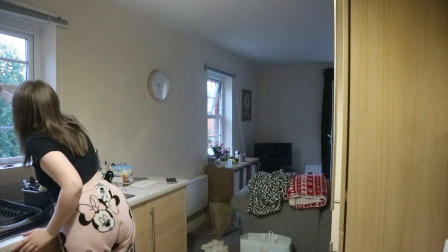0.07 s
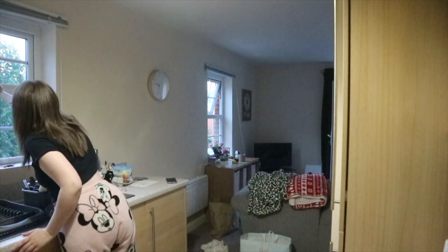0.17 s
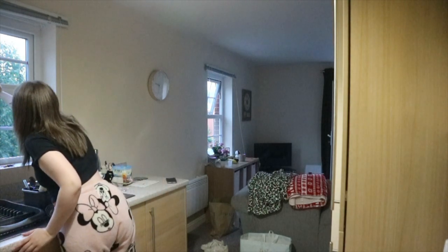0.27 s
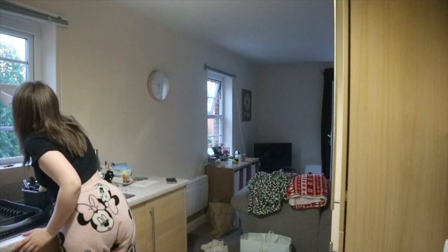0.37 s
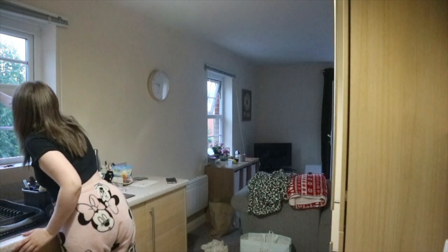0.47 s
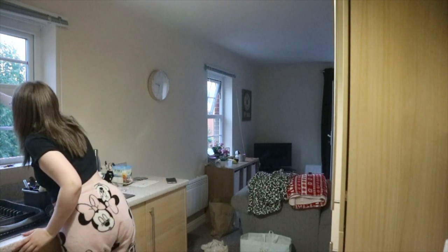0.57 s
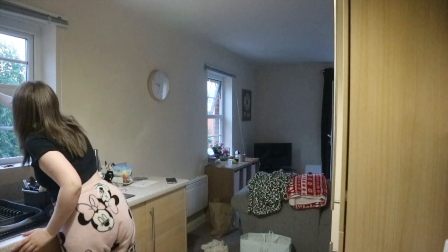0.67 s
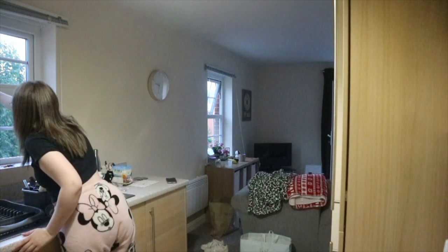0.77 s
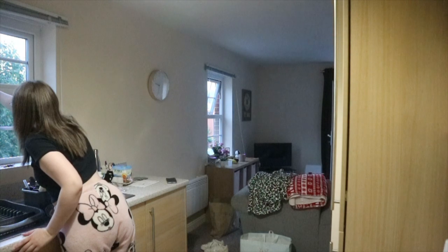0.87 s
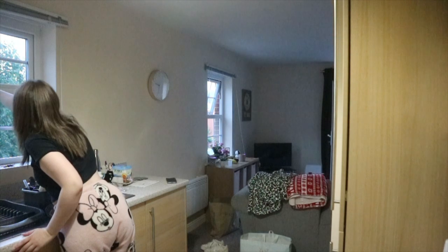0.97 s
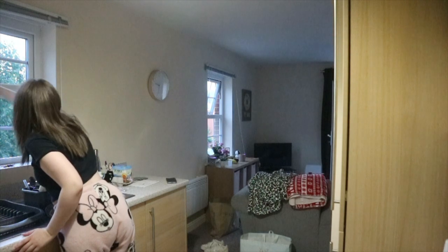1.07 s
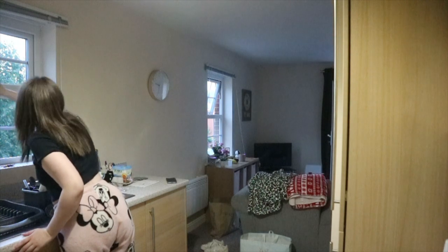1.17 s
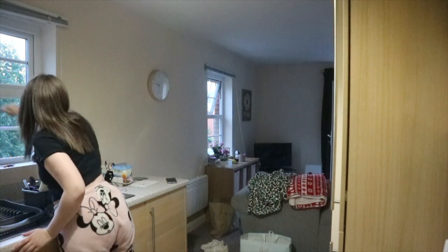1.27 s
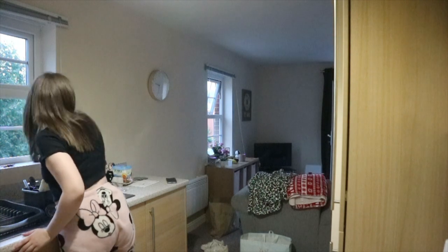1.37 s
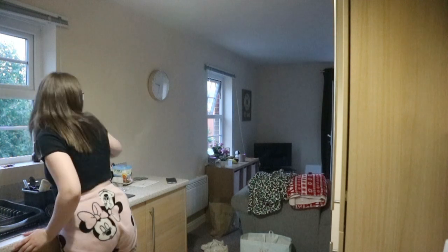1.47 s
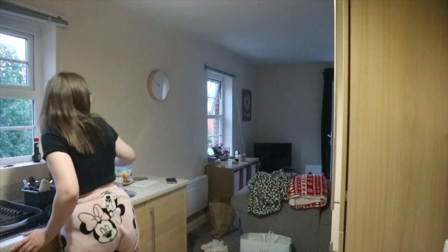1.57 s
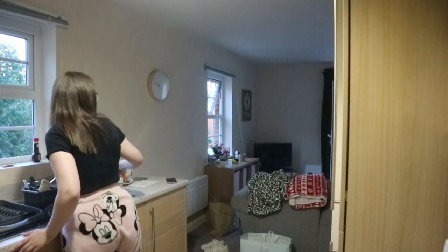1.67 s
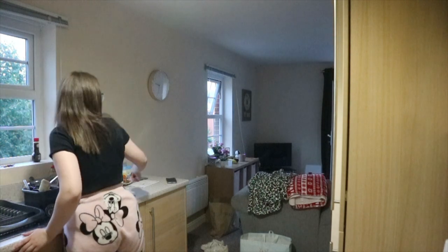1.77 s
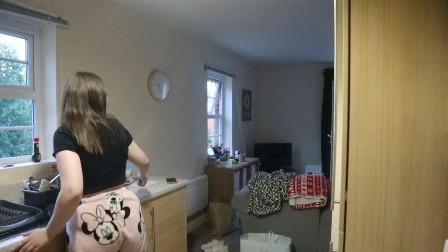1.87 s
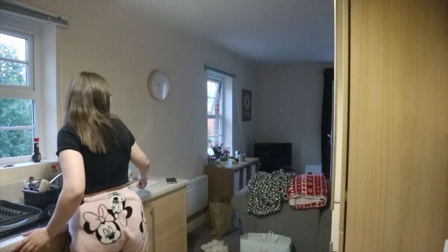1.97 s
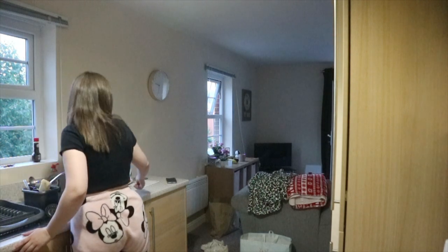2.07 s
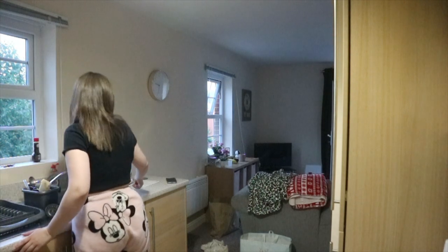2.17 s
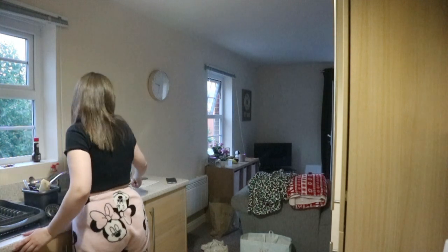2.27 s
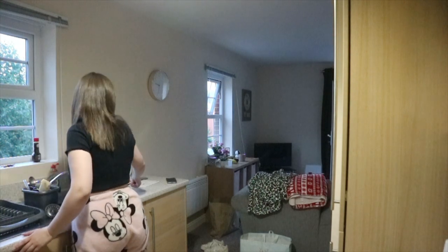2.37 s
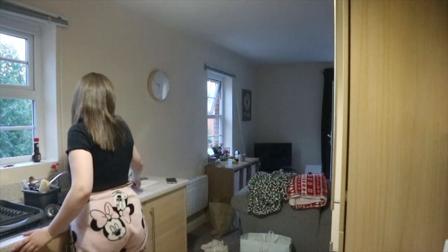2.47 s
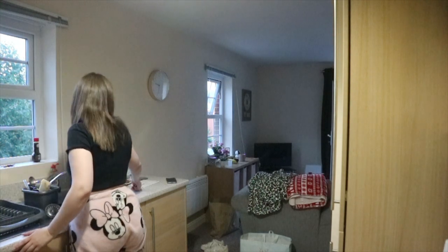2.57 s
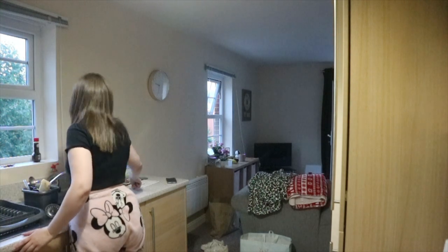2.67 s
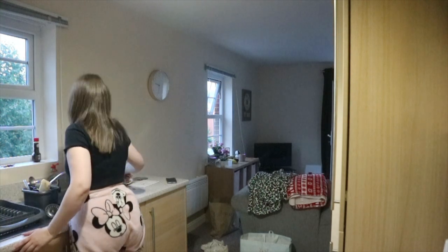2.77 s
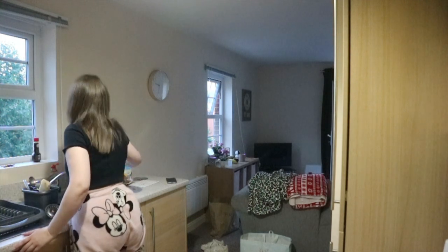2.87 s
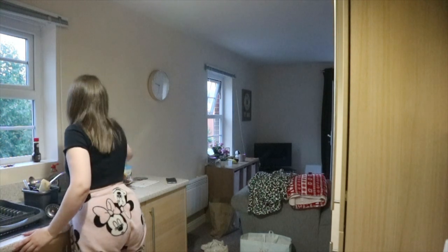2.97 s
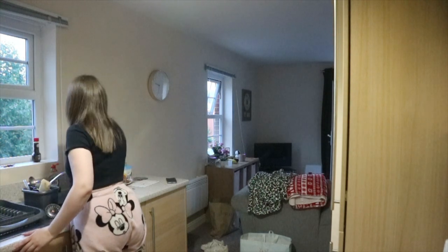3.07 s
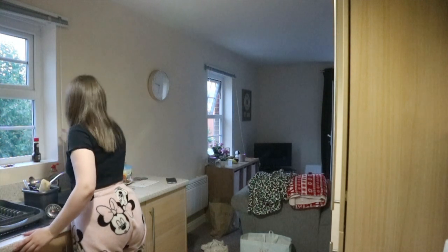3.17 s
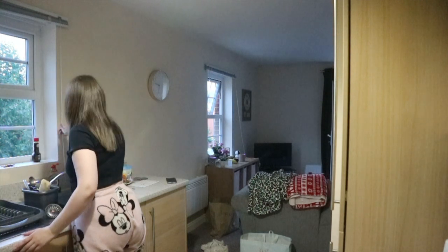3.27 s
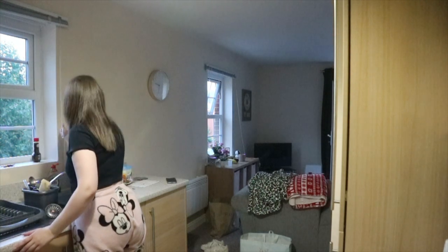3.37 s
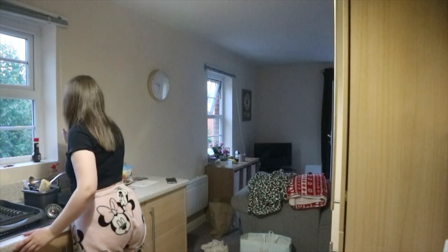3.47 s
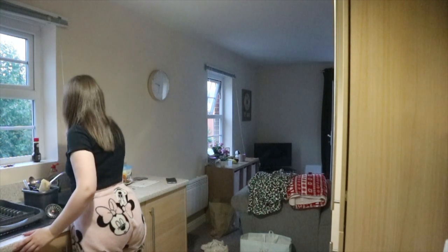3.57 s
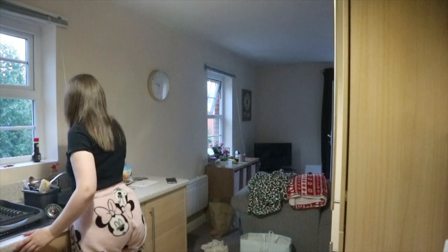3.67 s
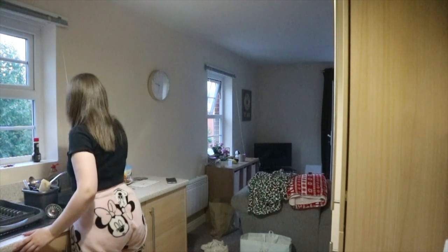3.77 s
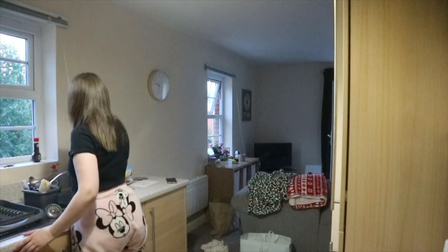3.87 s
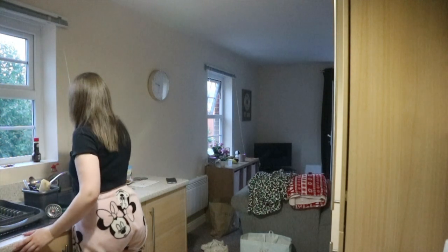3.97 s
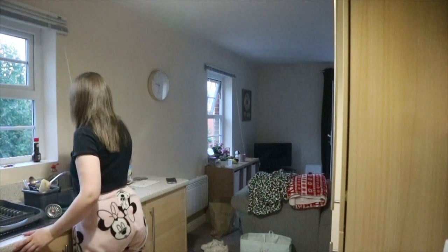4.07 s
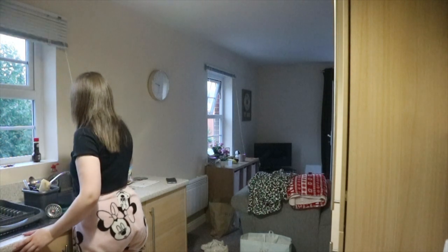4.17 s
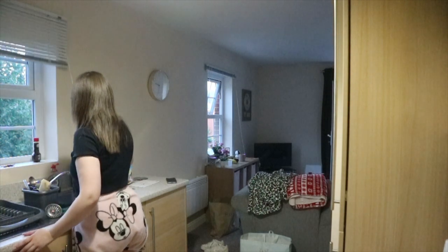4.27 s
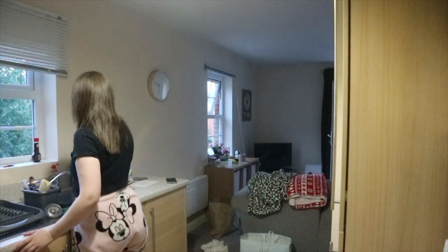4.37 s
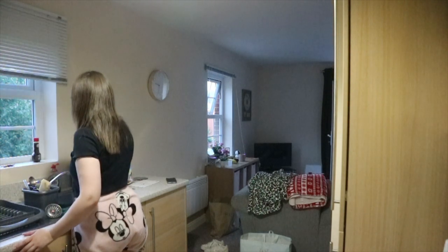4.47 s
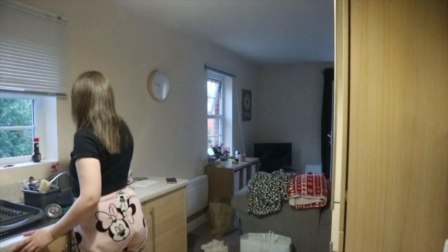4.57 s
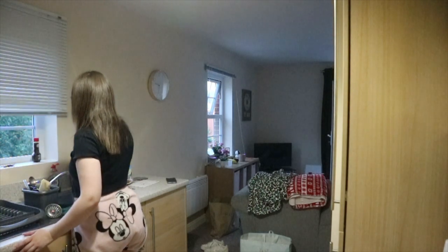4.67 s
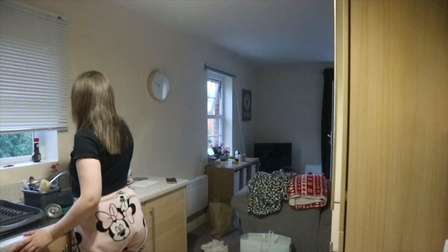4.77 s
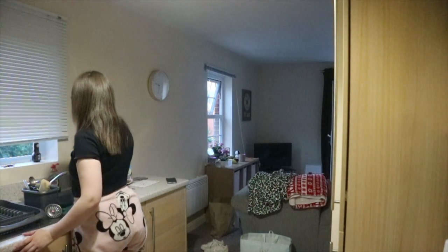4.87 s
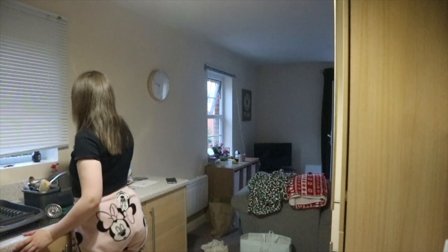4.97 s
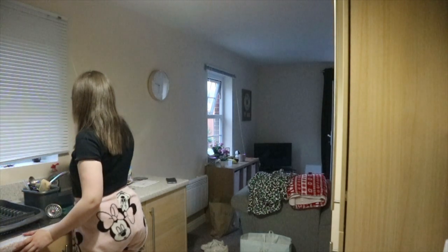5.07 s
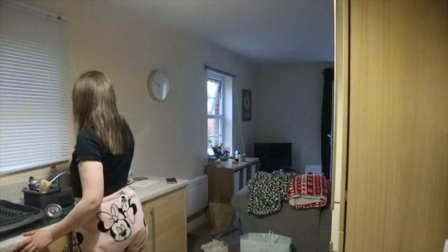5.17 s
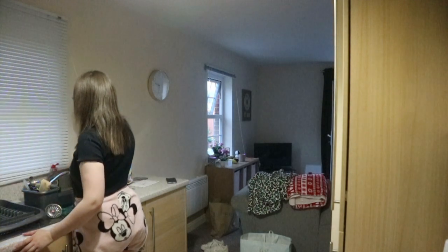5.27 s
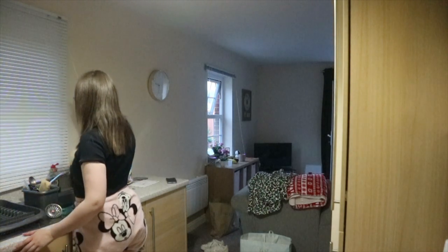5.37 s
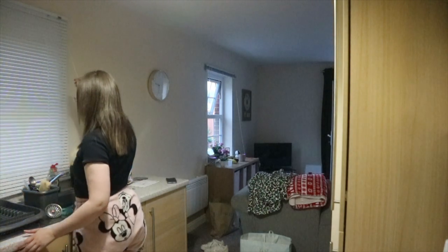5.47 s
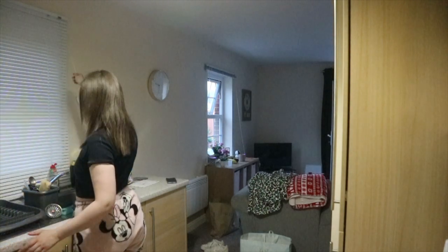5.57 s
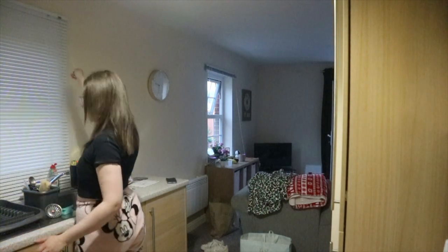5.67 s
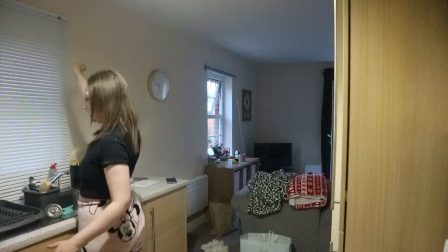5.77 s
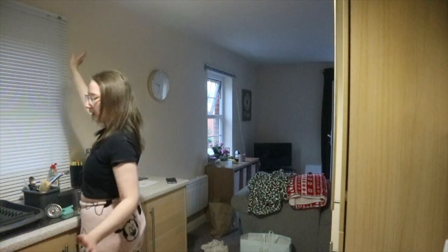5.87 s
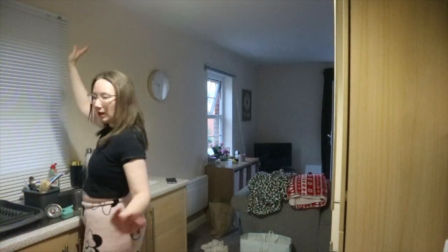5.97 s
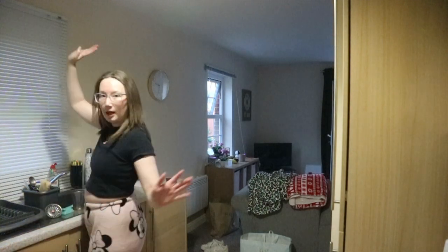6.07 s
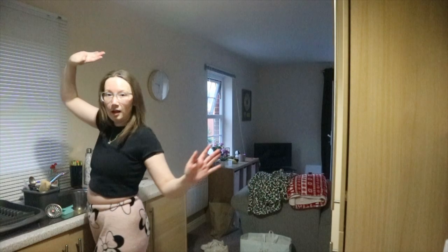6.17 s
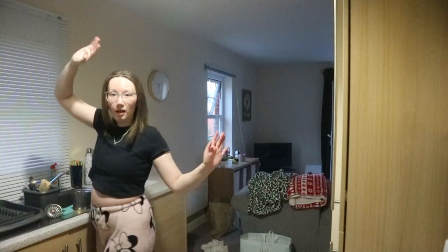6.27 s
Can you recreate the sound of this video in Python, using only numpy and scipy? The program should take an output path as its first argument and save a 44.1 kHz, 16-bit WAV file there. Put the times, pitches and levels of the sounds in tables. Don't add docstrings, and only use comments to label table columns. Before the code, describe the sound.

A small furnished kitchen with short reverberation, heard in close stereo over low rumble, mains hum and faint hiss. From 0.15 to 1.5 s a window sash is pushed shut: very quiet rubs, dry ticks, dull frame shudders and thin squeaks, clearest around 0.3-0.4, 0.8 and 1.07 s. It fades to near stillness, with one faint tick at 2.36 s. At 2.55-2.85 s a plastic tassel taps and rattles off its metal hook, with a tiny high ting. The cord tugs lightly at 3.5 s and snaps taut at 3.85 s. From 4.05 to 5.35 s the blind runs down, a loud, bright, stuttering rasp with metallic singing and slat slaps, briefly checked near 4.45 s. At 5.36-5.75 s the bar and slats clatter and thud onto the sill, then settle. At 6.11 s the cord lock snaps sharply, leaving a short low rail hum.

```python
import sys
import numpy as np
from scipy import signal
from scipy.fft import rfft, irfft
from scipy.io import wavfile
from scipy.ndimage import uniform_filter1d

SR = 44100
rng = np.random.default_rng(int(sys.argv[2]) if len(sys.argv) > 2 else 0)


def voltage_ratio(decibels):
    exponent = np.asarray(decibels, float) / 20
    return 10 ** exponent


def generate_wav(sig):
    pcm = np.round(np.clip(np.atleast_2d(sig).T, -1, 1) * 32767).astype(np.int16)
    wavfile.write(sys.argv[1], SR, pcm)


N = 278976
HZ = np.fft.rfftfreq(1 << 19, 1 / SR)[1:]


def cord(singing):
    # (frequency [Hz], level [dB per Hz])
    pull_body = [(600, -29), (1000, -9.5), (1350, 2.5), (2000, 1), (3000, 2), (4500, -8.5), (9000, -29),
                 (15000, -46)]
    # (frequency [Hz], level [dB per Hz])
    rasp_body = [(530, -41), (900, -16.5), (1360, 0), (1760, 0), (3000, 3), (4400, -4.5), (9000, -16.5),
                 (12000, -31.5), (15000, -26)]
    # (frequency [Hz], level [dB per Hz])
    lock_body = [(400, -43), (1000, -13), (2000, -6.5), (3000, -8), (5000, -18.5), (9000, -25.5),
                 (15000, -21)]
    # (frequency [Hz], width [Hz], level [dB])
    rail = [(2410, 22, -1.5), (2570, 46, -17.5), (2690, 23, -1.5), (2890, 36, -0.5), (3007, 25, -2.5),
            (3070, 38, -11), (3300, 16, -27), (3910, 21, -13), (4050, 53, -14.5), (4355, 28, -15),
            (4450, 57, -3.5), (5090, 48, -13), (5710, 31, -8), (5790, 56, -23.5)]
    # (frequency [Hz], width [Hz], level [dB])
    treble_bands = [(13000, 200, -8), (13200, 200, 4), (14100, 180, -8)]
    # (frequency [Hz], width [Hz], level [dB])
    ladder = [(124, 19, -9), (208.5, 15.4, -1.5), (285.5, 7.3, 0), (350, 90, -5), (398, 35, -5)]
    # (frequency [Hz], width [Hz], level [dB])
    flutter_modes = [(517, 46, -12), (614, 20, 5), (686, 50, 1), (771, 49, -4), (800, 430, -18.5)]
    # (time [s], peak level [dB], ring frequency [Hz], ring decay [s])
    cord_snaps = [(3.8445, -26, 3150, 0.011), (4.0582, -28, 2070, 0.0056), (4.6229, 2, 2760, 0.017),
                  (4.6489, -18, 1630, 0.0068), (4.9509, -6, 1480, 0.013), (5.2957, -6.5, 1610, 0.01),
                  (6.108, -28, 1550, 0.0049), (6.1125, -2.5, 1650, 0.0032), (6.1292, -1, 3074, 0.016)]
    # (time [s], peak level [dB], ring frequency [Hz], ring decay [s])
    cord_tugs = [(3.3977, -41.5, 2120, 0.0085), (3.4984, -29, 2760, 0.024), (3.5263, -24, 2654, 0.012),
                 (3.5986, -29.5, 1490, 0.0068), (3.6476, -31, 1280, 0.0059), (6.048, -44, 3140, 0.0071)]
    # (time [s], peak level [dB], ring frequency [Hz], ring decay [s])
    peels = [(4.0596, -26, 2990, 0.0087), (4.088, -23, 2630, 0.008), (4.1165, -19, 2890, 0.0095),
             (4.1298, -11.5, 2680, 0.011), (4.161, -6, 3290, 0.0097), (4.1731, -14, 3110, 0.016),
             (4.212, -8.5, 3075, 0.021), (4.2733, -4.5, 3240, 0.0085), (4.3003, -17, 2750, 0.01),
             (4.3743, 7, 2760, 0.0037), (4.505, -15, 3240, 0.01), (4.5344, -21, 3290, 0.0071),
             (4.5542, -10, 3570, 0.012), (4.606, -9, 4270, 0.01), (4.6235, -9, 2710, 0.0094),
             (4.677, -6, 2760, 0.014), (4.7416, -10, 2890, 0.0072), (4.7875, -11, 3115, 0.0058),
             (4.8236, -18, 3100, 0.008), (4.8898, -17, 4450, 0.012), (4.9613, -17, 3050, 0.0086),
             (4.9838, -8, 3120, 0.008), (5.0382, -13, 2890, 0.008), (5.1963, 1, 2914, 0.0033),
             (5.2875, -16, 2900, 0.008), (5.3344, -19, 3000, 0.008), (5.3597, -13, 2790, 0.013)]
    # (time [s], peak level [dB], ring frequency [Hz], ring decay [s])
    clacks = [(3.8445, -16.5, 4470, 0.0027), (3.8446, -23, 3300, 0.0075), (3.8447, -29.5, 1947, 0.019),
              (3.8449, -30, 1560, 0.0071), (3.4984, -33, 1420, .012), (3.4986, -46, 4250, 0.0079),
              (3.56, -41, 1420, 0.057), (6.1065, -20, 1930, .008), (6.1125, -24, 2000, 0.0037),
              (6.142, -32, 1570, 0.0075)]
    # (time [s], hold [s], level [dB])
    flickers = [(3.85, 0.033, -56.5), (4.07, 0.035, -55.5), (4.31, .04, -47), (4.37, .04, -46.5),
                (4.73, .03, -43), (4.79, .03, -42.5), (5.28, 0.046, -49.5), (6.14, 0.027, -51),
                (6.22, .02, -69)]

    pull, run, lock, ring, flutter, rumble = controls()
    slips = grains(per_s=2500, spread_db=2.6) * voltage_ratio(0.44 * drift(35))
    scrape = through(pull * slips, body(pull_body))
    scrape += through(lock * slips, body(lock_body))
    scrape += through(run * slips, body(rasp_body))

    swell_db = 5.5
    slide = 0.012
    force = (run + voltage_ratio(-3.5) * lock) * slips
    for hz, width_hz, db in rail:
        radius, angle = np.exp(-np.pi * width_hz / SR), 2 * np.pi * hz / SR
        drive = voltage_ratio(db + 16.5 + swell_db * np.tanh(drift(14.0))) * force
        poles = [1, -2 * radius * np.cos(angle), radius * radius]
        mode = signal.lfilter([1 - radius, 0, radius - 1], poles, drive + 1e-18)
        scrape += np.interp(np.arange(N) + slide * SR / 12 * drift(12), np.arange(N), mode)

    snaps = knocks(cord_snaps, body(lock_body), burst_s=0.003, ring_db=-12.5, gain_db=-5.5)
    snaps += knocks(cord_tugs, body(pull_body), burst_s=0.0054, ring_db=-0.23, gain_db=-4.1)
    snaps += knocks(peels, body(rasp_body), burst_s=0.0031, ring_db=3.1, gain_db=-11.5)
    snaps += knocks(clacks, body(lock_body), burst_s=0.00097, ring_db=3.7, gain_db=-4.5)
    flicker = strokes(flickers, rise_db_per_s=700, fall_db_per_s=500)[0]
    snaps += voltage_ratio(14.5) * flicker * through(slips, body(modes=treble_bands))

    slats = voltage_ratio(-1.5) * rumble * through(slips, body(modes=ladder))
    slats += voltage_ratio(0.5) * flutter * through(slips, body(modes=flutter_modes))
    return voltage_ratio(-1.0) * scrape + voltage_ratio(-0.07) * ring * singing + slats + snaps


def controls():
    # (time [s], effort level [dB])
    efforts = [
        (3.3, -65),
        (3.488, -50),
        (3.502, -38),
        (3.612, -52),
        (3.841, -38.5),
        (3.846, -20),
        (3.862, -31),
        (3.954, -51),
        (4.04, -47),
    ]
    # (time [s], rasp level [dB])
    speeds = [
        (4.052, -38.5),
        (4.182, -21.5),
        (4.384, -16.5),
        (4.424, -29),
        (4.492, -30),
        (4.59, -18),
        (4.746, -17.5),
        (5.126, -26),
        (5.36, -20),
    ]
    # (time [s], hold [s], level [dB])
    bites = [
        (6.107, 0.047, -23),
        (6.2, 0.042, -42.5),
        (6.27, 0.044, -50.5),
    ]
    # (time [s], hold [s], level [dB])
    surges = [(4.058, 0.026, -42.5), (4.208, 0.098, -22.5), (4.345, 0.037, -14.5), (4.47, 0.058, -31),
              (4.575, 0.014, -22.5), (4.63, 0.0078, -25), (4.665, 0.077, -21), (4.735, 0.088, -17.5),
              (4.85, 0.02, -21.5), (4.93, 0.014, -22.5), (4.955, 0.017, -19), (5.025, 0.0079, -26.5),
              (5.068, 0.0085, -23.5), (5.11, 0.025, -22.5), (5.155, 0.0069, -23), (5.222, 0.033, -18),
              (5.268, 0.004, -25), (5.296, 0.019, -14.5), (5.345, 0.0085, -18.5), (6.109, 0.0028, -12.5),
              (6.164, 0.054, -28.5), (6.27, 0.034, -37)]
    taut_s = 3.7
    unfold_s = 4.195
    jerk_db_per_s = 8992

    t = np.arange(N) / SR
    pull, run = levels(efforts)[0], levels(speeds)[0]
    lock = strokes(bites, jerk_db_per_s, fall_db_per_s=326)[0]
    ring = voltage_ratio(-8.5 - 9.9 * (t < taut_s)) * pull
    ring = ring + strokes(surges[:-3], rise_db_per_s=1801, fall_db_per_s=600)[0]
    ring = ring + strokes(surges[-3:], jerk_db_per_s, fall_db_per_s=899)[0]
    opening = run * voltage_ratio(-10 * (t < unfold_s))
    flutter = voltage_ratio(-21.5) * pull + voltage_ratio(-17.5) * opening + voltage_ratio(-10.5) * lock
    thinning = voltage_ratio(-15.0 - 17 * (t - unfold_s))
    rumble = voltage_ratio(-28.0) * pull + thinning * opening + voltage_ratio(-21.5) * lock
    return pull, run, lock, ring, flutter, rumble


def rail_ring(evenness):
    # (frequency [Hz], width [Hz], level [dB])
    ring_modes = [(1557, 14, 0), (1600, 30, -20), (1520, 30, -20), (1470, 40, -20), (1320, 40, -22)]
    ring = through(grains(per_s=1500, spread_db=0.73), body(modes=ring_modes))
    swing = np.sqrt(uniform_filter1d(ring ** 2, size=1500))
    wander = np.arange(N) + np.cumsum(0.008 * (swing / swing.mean() - 1))
    limited = ring / (swing + 0.046) ** np.clip(evenness, 0, 1)
    return rms_one(np.interp(wander, np.arange(N), limited))


def rail_hum():
    # (time [s], hold [s], level [dB])
    swings = [
        (6.166, 0.045, -31.5),
        (6.25, 0.08, -44.5),
    ]
    phase = 2 * np.pi * 206 * np.arange(N) / SR
    hum = np.sin(phase) + 0.15 * np.sin(3.13 * phase)
    return strokes(swings, rise_db_per_s=593, fall_db_per_s=700)[0] * voltage_ratio(3.5) * hum


def heap():
    # (time [s], hold [s], clatter level [dB], thud level [dB])
    pile = [
        (5.362, 0.012, -7.5, -20.5),
        (5.405, 0.035, -23, -45),
        (5.45, 0.0099, -9.5, -19),
        (5.5, 0.06, -17, -25),
        (5.562, 0.049, -13.5, -23),
        (5.645, 0.026, -12, -29),
        (5.69, 0.053, -24.5, -54),
        (5.78, 0.06, -37, -51.5),
        (5.87, 0.2, -52, -61),
    ]
    # (time [s], peak level [dB], ring frequency [Hz], ring decay [s])
    heap_knocks = [(5.36, -7, 648, 0.014), (5.3605, -9, 1980, 0.0046), (5.366, -2, 1786, 0.0048),
                   (5.374, -11, 1610, 0.0065), (5.382, -4, 2750, 0.0059), (5.45, -13, 2410, 0.008),
                   (5.464, -6, 2885, 0.0067), (5.507, -12, 1380, 0.008), (5.544, -11, 1990, 0.0059),
                   (5.56, -4.5, 1590, 0.011), (5.562, 0, 1120, 0.0097), (5.574, -2.5, 2404, 0.011),
                   (5.582, -5.5, 1610, 0.007), (5.614, -14, 1200, 0.011), (5.643, -5, 840, 0.0065),
                   (5.65, -8, 1223, 0.009), (5.666, -10.5, 1943, 0.0075), (5.699, -6.5, 1163, 0.0058)]
    # (time [s], peak level [dB], ring frequency [Hz], ring decay [s])
    low_thumps = [(.318, -30, 70, 0.034), (.405, -36, 69.6, 0.018), (.815, -34, 74.5, 0.016),
                  (1.05, -34, 66.4, 0.022), (1.14, -41, 300, 0.024), (3.6, -41.5, 354, 0.029),
                  (5.375, -30.5, 121, 0.027), (5.46, -34, 115.8, 0.092), (5.562, -20.5, 351, 0.023),
                  (5.65, -22, 342, 0.0074), (5.75, -37.5, 153, 0.02)]
    # (frequency [Hz], level [dB per Hz])
    heap_body = [(80, -23), (234, -18), (423, -28), (641, -3.5), (2300, -7.5), (5000, -19.5), (9500, -42.5),
                 (15000, -70)]
    # (frequency [Hz], width [Hz], level [dB])
    slat_modes = [(638, 47, -4.5), (1410, 520, -1), (1590, 120, -28.5), (1973, 52, 0), (2410, 31, 3),
                  (2760, 340, -3.5)]

    clatter, thud = strokes(pile, rise_db_per_s=2499, fall_db_per_s=393)
    slats = body(heap_body, slat_modes, modes_db=1.5)
    contacts = grains(per_s=1500, spread_db=1.3)
    bar = through(thud * contacts, body(modes=[(635, 360, 16.0), (840, 60, -16.5)]))
    bangs = knocks(heap_knocks, slats, burst_s=0.0031, ring_db=0.43, gain_db=-5.5)
    sill = body(modes=[(328, 370, 0.0048)])
    thumps = knocks(low_thumps, sill, burst_s=0.021, ring_db=8.2, gain_db=-7.0)
    return voltage_ratio(-5.5) * through(clatter * contacts, slats) + voltage_ratio(-8.5) * bar + bangs + thumps


def tassel():
    # (time [s], hold [s], rattle level [dB])
    rattles = [
        (2.558, 0.002, -34),
        (2.59, 0.1, -61),
        (2.695, 0.049, -32.5),
        (2.747, 0.015, -25.5),
        (2.805, 0.044, -24.5),
    ]
    # (time [s], peak level [dB], ring frequency [Hz], ring decay [s])
    tassel_taps = [(2.558, -15.5, 2570, 0.0034), (2.693, -17, 2640, 0.0021), (2.747, -9, 2595, 0.0052),
                   (2.805, -10, 2940, 0.0012), (2.597, -27.5, 2340, 0.0089), (2.5535, -29, 2700, .002),
                   (2.612, -30, 1814, .003), (2.64, -31, 2250, .004), (2.6905, -35, 2600, .002),
                   (2.752, -22, 3300, 0.0067), (2.81, -15.5, 5000, 0.0091)]
    # (frequency [Hz], level [dB per Hz])
    tassel_body = [(350, -32.5), (570, -4.5), (830, -9), (2900, -2), (6000, -12), (10000, -27.5),
                   (12500, -68), (15000, -56)]
    # (frequency [Hz], width [Hz], level [dB])
    shell_modes = [(2250, 450, -4), (2900, 270, 0.5), (5000, 950, -7)]
    # (frequency [Hz], width [Hz], level [dB])
    hook_modes = [(11750, 45, 0), (14200, 50, -5), (14700, 50, -6)]
    # (time [s], hold [s], level [dB])
    hook_song = [
        (2.7, 0.033, -85),
        (2.742, 0.033, -66),
        (2.812, 0.019, -38),
        (2.88, 0.098, -82),
    ]

    plastic, contacts = body(tassel_body, shell_modes), grains(per_s=2500, spread_db=1.6)
    taps = knocks(tassel_taps, plastic, burst_s=0.031, ring_db=0.94, gain_db=-7.5)
    hook_level = strokes(hook_song, rise_db_per_s=900, fall_db_per_s=262)[0]
    hook = hook_level * through(contacts, body(modes=hook_modes))
    rattle_level = strokes(rattles, rise_db_per_s=2500, fall_db_per_s=218)[0]
    rattle = through(rattle_level * contacts, plastic)
    return voltage_ratio(-5.0) * rattle + voltage_ratio(18.0) * hook + taps


def window(singing):
    # (time [s], hold [s], rub level [dB], frame shudder level [dB])
    shoves = [(0.21, 0.01, -66, -40), (0.31, 0.038, -57, -28.5), (0.41, 0.028, -50, -36.5),
              (0.57, 0.018, -66, -38.5), (0.71, 0.01, -65, -40), (0.76, 0.011, -59, -57),
              (0.81, 0.019, -54, -31.5), (0.96, 0.065, -66, -40), (1.04, 0.0092, -60, -28.5),
              (1.075, 0.013, -53, -67), (1.19, 0.16, -66, -62), (1.4, 0.076, -59.5, -50),
              (1.6, 0.43, -71.5, -46.5), (2.08, 0.17, -72, -43.5), (2.36, 0.11, -59, -45.5)]
    # (time [s], hold [s], level [dB])
    squeaks = [
        (0.32, 0.1, -65),
        (0.97, 0.02, -60),
        (1.03, 0.11, -63),
        (1.18, 0.22, -59.5),
        (1.56, 0.04, -66),
        (2.19, 0.01, -62),
    ]
    # (time [s], peak level [dB], ring frequency [Hz], ring decay [s])
    sash_ticks = [(0.1496, -50.5, 1510, 0.023), (0.2059, -43, 3570, 0.0044), (0.3042, -36, 4330, 0.0051),
                  (0.3694, -42, 2190, 0.0076), (0.4095, -33.5, 2020, 0.007), (2.363, -48, 2270, 0.028),
                  (0.6995, -46.5, 1090, 0.0076), (0.7673, -34.5, 3170, 0.004),
                  (0.7994, -42.5, 3970, 0.0091), (0.9982, -45, 1470, 0.007), (1.036, -40, 1480, 0.0027),
                  (1.069, -31, 2500, 0.0047), (1.1106, -39, 2750, 0.013), (1.1478, -44, 1590, 0.007),
                  (1.3992, -41, 2160, 0.0065), (1.447, -47, 2380, 0.0084), (1.76, -57, 1090, 0.007),
                  (2.1134, -74, 1680, 0.007)]
    # (time [s], peak level [dB], ring frequency [Hz], ring decay [s])
    handle = [(.70, -55, 1290, 0.043), (.71, -53.5, 1955, 0.06), (.74, -49, 1094, 0.044),
              (.76, -52, 1960, 0.024), (.80, -55, 2440, 0.054), (1.10, -54, 7420, 0.03),
              (1.39, -53, 4450, 0.012), (1.075, -41, 2640, 0.033), (.797, -51, 7140, .003),
              (.832, -44, 3550, .003), (.997, -50, 4500, .003), (1.035, -43, 4050, .004),
              (1.069, -46, 8500, 0.0037), (1.072, -54, 11200, 0.029)]
    # (frequency [Hz], level [dB per Hz])
    sash_body = [(410, -46), (700, 4.5), (900, -6.5), (2660, -1.5), (5000, -11.5), (9000, -30),
                 (15000, -16)]
    # (frequency [Hz], level [dB per Hz])
    shudder_body = [(15, -46), (25, 6.5), (70, 0.5), (156, -8.5), (199, -5.5), (249, -24), (282, -5.5),
                    (400, -29), (520, -85), (880, -120)]
    rise_db_per_s, fall_db_per_s = 419, 260

    rub, shudder = strokes(shoves, rise_db_per_s, fall_db_per_s)
    ring = strokes(squeaks, rise_db_per_s, fall_db_per_s)[0]
    waver = 0.014
    wavering = np.interp(np.arange(N) + waver * SR / 15 * drift(15), np.arange(N), singing)
    squeak = voltage_ratio(-1.5 + 4.2 * np.tanh(drift(40.5))) * ring * wavering
    sash = body(sash_body)
    ticks = knocks(sash_ticks, sash, burst_s=0.016, ring_db=-1.0, gain_db=-2.0)
    ticks += knocks(handle, sash, burst_s=0.004, ring_db=6.2, gain_db=-7.0)
    shake = voltage_ratio(-5.5) * shudder * through(rng.standard_normal(N), body(shudder_body))
    rubbing = voltage_ratio(1.5) * through(rub * grains(per_s=3000, spread_db=3.4), sash)
    return rubbing + ticks + shake + squeak


def room(direct, wet_db):
    # (frequency [Hz], T60 [s])
    room_t60 = [(100, 0.69), (400, 0.47), (1000, 0.31), (4000, 0.28), (12000, 0.19)]
    t, tail, white = np.arange(SR // 2) / SR, 0, rng.standard_normal(SR // 2)
    for low in 40 * 2 ** np.arange(9.):
        octave = signal.butter(2, [low, 2 * low], "band", fs=SR, output="sos")
        tail = tail + signal.sosfilt(octave, white) * voltage_ratio(-60 * t / at_hz(room_t60, 1.4 * low))
    tail = tail * np.minimum(t / 0.0016, 1)
    tail = voltage_ratio(wet_db) * tail / np.sqrt(np.sum(tail ** 2))
    tail[0] = direct
    return tail


def port(x, colour, turn):
    return irfft(rfft(x, 2 * len(HZ)) * np.r_[0, turn * voltage_ratio(at_hz(colour, HZ))])[:N]


def room_tone():
    # (time [s], level [dB])
    tone = [(0.0, -48), (0.83, -75), (0.95, -60.5), (2.24, -53.5), (2.52, -51), (3.1, -63.5), (4.1, -52.5),
            (4.65, -55.5), (6.33, -69)]
    # (frequency [Hz], level [dB per Hz])
    tone_mid = [(15, -31), (25, -11), (43, -25), (106, -0.5), (152, -13.5), (243, -12), (314, -4),
                (358, -5), (386, -23.5), (418, -15), (584, -11), (1240, -26.5), (1340, -23.5), (12000, -46),
                (15600, -89), (22000, -120)]
    # (frequency [Hz], level [dB per Hz])
    tone_side = [(25, -58), (110, -20), (316, -10), (900, -15.5), (2000, -17.5), (4000, -22.5),
                 (8000, -26.5), (15800, -37)]
    # (frequency [Hz], width [Hz], level [dB])
    whines = [(2750, 35, 1.5), (11750, 120, -46), (15500, 100, -33)]
    # (frequency [Hz], level [dB])
    mains = [(50, -1), (100, -5.5)]

    t = np.arange(N) / SR
    rumble = levels(tone)[0]
    hush = voltage_ratio(-50.5 - 0.19 * t)
    mid = through(rng.standard_normal(N), body(tone_mid))
    low = signal.sosfilt(signal.butter(1, 150, fs=SR, output="sos"), mid)
    hum = sum(voltage_ratio(db) * np.sin(2 * np.pi * hz * t) for hz, db in mains)
    side = voltage_ratio(-10.5) * hush * through(rng.standard_normal(N), body(tone_side, whines))
    return rumble * (voltage_ratio(-1.0) * rms_one(low) + hum) + voltage_ratio(-4.0) * hush * rms_one(mid - low), side


def knocks(events, pulse, burst_s, ring_db, gain_db):
    out, t = np.zeros(N + SR), np.arange(SR // 8) / SR
    crackles = rng.standard_normal((len(events), len(t)))
    for (s, db, hz, ring_s), crackle in zip(events, crackles):
        crack = signal.fftconvolve(crackle * np.exp(-t / burst_s), pulse[:len(t)])[:len(t)]
        pair = np.sin(2 * np.pi * hz * t) + 0.05 * np.sin(2 * np.pi * hz * 1.2 * t)
        ring = voltage_ratio(ring_db) * pair * np.exp(-t / max(ring_s, .001))
        i = round(s * SR)
        out[i:i + len(t)] += voltage_ratio(db + gain_db) * (crack / np.abs(crack).max() + ring)
    return out[:N]


def grains(per_s, spread_db):
    sizes = voltage_ratio(spread_db * np.minimum(rng.exponential(1, N), 4)) * rng.choice([-1, 1], N)
    return rms_one(sizes * (rng.random(N) < per_s / SR))


def body(spectrum=None, modes=(), modes_db=0.):
    hz = HZ[7::8]
    power = 1e-9 + (voltage_ratio(at_hz(spectrum, hz)) ** 2 if spectrum else 0)
    for mode_hz, width_hz, db in modes:
        detune = (hz - mode_hz ** 2 / hz) / width_hz
        power = power + voltage_ratio(db + modes_db) ** 2 / (1 + detune ** 2) ** 1.41
    cepstrum = irfft(.5 * np.log(np.r_[power[0], power]))
    cepstrum[1:len(hz)] *= 2
    cepstrum[len(hz) + 1:] = 0
    pulse = irfft(np.exp(rfft(cepstrum)))[:SR // 2]
    return pulse / np.sqrt(np.sum(pulse ** 2))


def through(x, pulse):
    return signal.fftconvolve(x, pulse)[:N]


def strokes(rows, rise_db_per_s, fall_db_per_s):
    t, out = np.arange(0, N + 16, 16) / SR, 0
    for s, hold_s, *db in rows:
        loss_db = rise_db_per_s * np.maximum(s - t, 0) + fall_db_per_s * np.maximum(t - s - hold_s, 0)
        out = out + np.outer(voltage_ratio(np.array(db)), voltage_ratio(-np.minimum(loss_db, 200)))
    return [np.interp(np.arange(N) / SR, t, gain) for gain in out]


def levels(*spans):
    t, out = np.arange(N) / SR, 0
    for rows in spans:
        s, *columns = np.transpose(rows)
        out = out + np.array([voltage_ratio(np.interp(t, s, c, -150, -150)) for c in columns])
    return out


def drift(per_s):
    points = rng.standard_normal(400)[:int(N / SR * per_s) + 2]
    return 1.22 * np.interp(np.arange(N) / SR * per_s, np.arange(len(points)), points)


def at_hz(points, hz):
    return np.interp(np.log(hz), np.log(np.array(points)[:, 0]), np.array(points)[:, 1])


def rms_one(x):
    return x / np.sqrt(np.mean(x ** 2) + 1e-20)


def scene():
    # (frequency [Hz], level [dB])
    port_sum = [(25, -22), (60, -2.5), (7000, 0), (10000, -1.5), (11500, -4), (13500, -16.5), (15000, -32)]
    # (frequency [Hz], level [dB])
    port_side = [(60, -52), (200, -42), (700, 1.5), (1300, 2.5), (2400, 4), (4400, 17), (8000, 22.5),
                 (11000, 31.5), (15000, 5.5)]
    singing = rail_ring(evenness=0.8)
    dry = window(singing) + tassel() + cord(singing) + heap()
    mid = port(through(dry, room(direct=0.83, wet_db=-4.5)) + rail_hum(), port_sum, 0.99)
    side = port(through(dry, room(direct=0.05, wet_db=-21.0)), port_side, 1j)
    tone_mid, tone_side = room_tone()
    mid, side = mid + tone_mid, side + tone_side
    return np.array([mid + side, mid - side])


def low_pass(x):
    return signal.sosfilt(signal.butter(12, 16040, fs=SR, output="sos"), x)


def record(dry):
    rounded = 0.9 * np.tanh(dry / 0.9)
    cut = signal.cheby2(20, 70, 16150, fs=SR, output="sos")
    mix = signal.sosfilt(cut, rounded)
    return low_pass(mix)


dry = scene()
out = record(dry)
generate_wav(out)
```